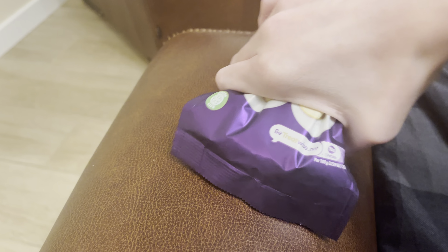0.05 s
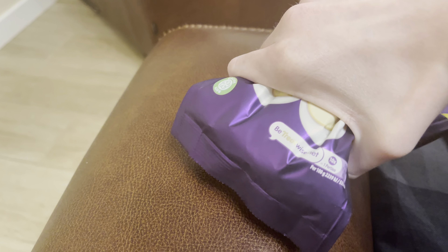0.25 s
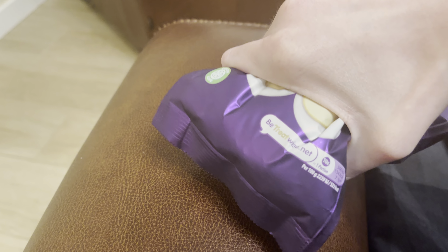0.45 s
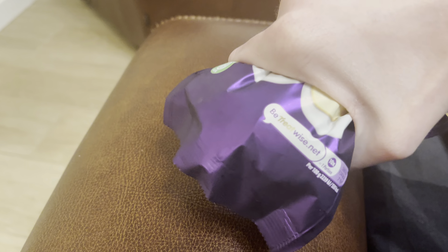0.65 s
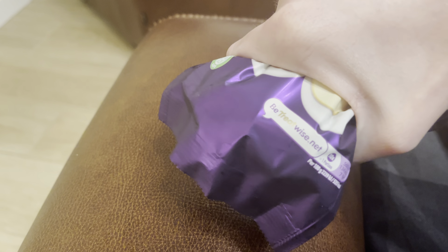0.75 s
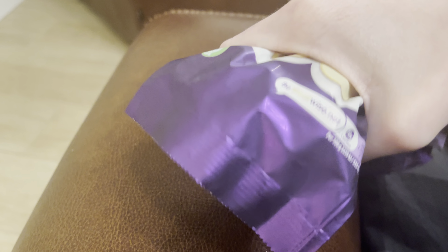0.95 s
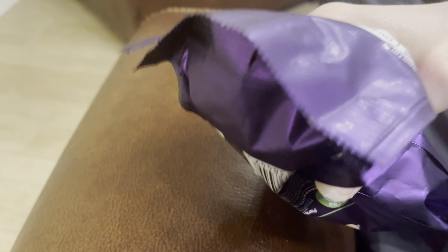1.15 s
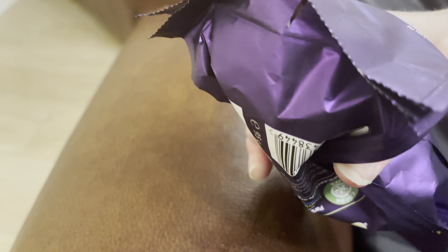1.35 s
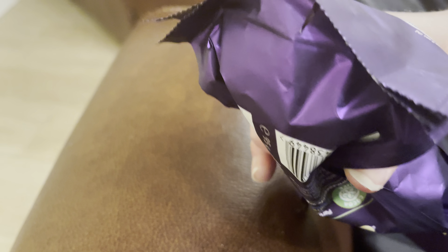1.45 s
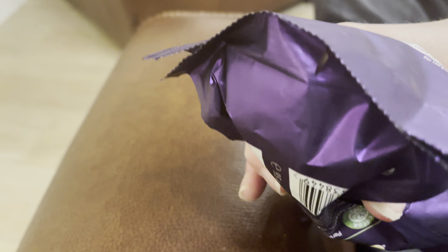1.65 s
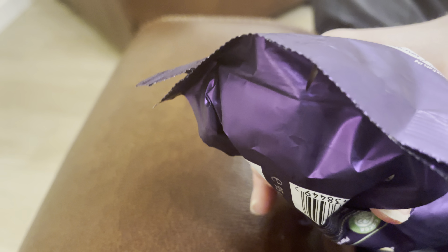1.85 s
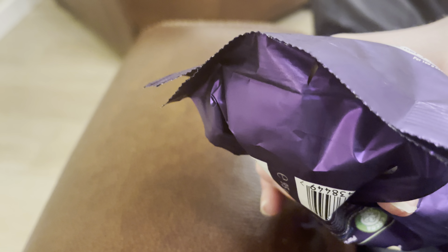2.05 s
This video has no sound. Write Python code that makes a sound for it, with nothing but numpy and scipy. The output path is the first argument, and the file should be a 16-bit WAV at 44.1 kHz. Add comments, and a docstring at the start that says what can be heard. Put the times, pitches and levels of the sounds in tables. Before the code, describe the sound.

A small foil pouch is squeezed close to a stereo microphone in a quiet furnished room. Bright creases snap over rustling and dull bumps, with a stronger thud near 0.6 s. At about 0.7 s the seam tears and air bursts out in one loud, low pop, puffing until 1 s. Slack foil crackles until about 1.3 s, then ticks ever more faintly to 2 s over soft room hush.

```python
"""A quiet furnished room: a hand squeezes a small foil pouch close to a stereo microphone.
Creases snap, each a short panel ring with bursts of noise; small random ticks and a rustle fill in beneath.
The pouch body bumps and rumbles; the seam tears near 0.7 s, the air pops out in one swing and puffs on.
The slack foil goes on ticking, ever more faintly, over a soft hush and a short echo of the room."""
import sys
import numpy as np
from scipy import signal
from scipy.fft import rfft, irfft
from scipy.io import wavfile
from scipy.ndimage import uniform_filter1d

SR = 44100
rng = np.random.default_rng(int(sys.argv[2]) if len(sys.argv) > 2 else 0)


def to_wav(s):
    """Save 16-bit WAV."""
    ch = np.atleast_2d(s).T  # columns
    pcm = np.round(np.clip(ch, -1, 1) * 32767)  # PCM
    wavfile.write(sys.argv[1], SR, pcm.astype(np.int16))


N = 92610
HZ = np.maximum(np.fft.rfftfreq(2 * N, 1 / SR), 1)  # filter frequencies, padded to twice the length


def undb(db):
    """Amplitude factor for a level in dB."""
    return 10 ** (np.asarray(db) / 20)


def over_hz(table):
    """Read a table at every filter frequency, straight lines on a log frequency axis."""
    hz, value = np.array(table).T
    return np.interp(np.log(HZ), np.log(hz), value)


def over_time(table):
    """Read a table at every sample, straight lines in time."""
    seconds, value = np.array(table).T
    return np.interp(np.arange(N) / SR, seconds, value)


def shape(x, gain):
    """Filter by a gain for each frequency."""
    return irfft(rfft(x, 2 * N) * gain, 2 * N)[..., :N]


def resonance(hz, width_hz):
    """Response of a damped resonator, with a gain of 1 at its centre."""
    return 1j * HZ * width_hz / (hz ** 2 - HZ ** 2 + 1j * HZ * width_hz)


def flicker(rate_hz):
    """Random levels held 1 / rate_hz seconds, then smoothed into glides."""
    hold = int(SR / rate_hz)
    steps = np.repeat(rng.standard_normal(N // hold + 1), hold)
    return uniform_filter1d(steps, hold)[:N]


def ring(t, hz, fall_cycles, turn):
    """A tone that swells and dies within a few cycles; its envelope peaks at 1."""
    rise_cycles = 0.29
    swell = (1 - np.exp(-t * hz / rise_cycles)) * np.exp(-t * hz / fall_cycles)
    return swell / swell.max() * np.sin(2 * np.pi * (hz * t + turn))


def room_hush():
    """Quiet room tone: steady noise, weighted to the lows, independent left and right."""
    # Colour of the quiet room: (f/Hz, relative level/dB per Hz)
    room_colour = [(60, -8), (300, -11), (1200, -10.5), (4600, -27.5), (12000, -35.5)]
    hush = shape(rng.standard_normal((2, N)), undb(over_hz(room_colour)))
    return hush / hush.std() * undb(-69)


def room_echo(near):
    """Reflections off the room, as a short noise tail that decays exponentially."""
    echo_db, t60_s = -11, .1
    centre_hz, width_hz = 1800, 7000
    t = np.arange(N) / SR
    tail = rng.standard_normal((2, N)) * undb(-60 * t / t60_s)
    tail = tail * (t > .004)  # the first reflections come after 4 ms
    tail = tail / np.sqrt(np.sum(tail ** 2, axis=1, keepdims=True))
    return undb(echo_db) * shape(near, rfft(tail, 2 * N) * resonance(centre_hz, width_hz) ** 2)


def body():
    """The pouch body flexes in short damped low bumps, over the wavering rumble of the kneading hand."""
    # Dull bumps of the pouch body: (t/s, f/Hz, level/dB)
    thumps = [(0.1668, 455, -31), (0.2028, 423, -30.5), (0.2239, 258, -33.5), (0.2794, 315, -34),
              (0.3106, 338, -24), (0.3532, 351, -34), (0.4225, 300, -34), (0.475, 175.4, -30),
              (0.5417, 335, -34), (0.5794, 348, -19), (0.706, 467, -20), (0.7103, 490, -13.5),
              (1.0596, 443, -30.5), (1.323, 543, -37.5), (1.433, 311, -39.5), (1.5216, 470, -42),
              (1.7097, 470, -48)]
    # Low rumble of the hand kneading the pouch: (t/s, level/dB)
    rumble_level = [(.1, -69), (.45, -62), (1.15, -60.5), (1.7, -72.5), (2, -80.5)]
    thump_cycles, rumble_hz = 0.79, 109
    knock_s, knock_hz, knock_db, knock_cycles = 1.5875, 427, -44, 4.9  # one bump rings hollow
    t = np.arange(N) / SR
    bumps = undb(knock_db) * ring(np.maximum(t - knock_s, 0), knock_hz, knock_cycles, 0)
    for s, hz, db in thumps:
        bumps = bumps + undb(db) * ring(np.maximum(t - s, 0), hz, thump_cycles, 0)
    rumble = shape(rng.standard_normal(N), resonance(rumble_hz, rumble_hz))
    waver_db = 4.1 * flicker(14.0)
    rumble = rumble / rumble.std() * undb(over_time(rumble_level) + waver_db)
    no_sub = 1 / np.sqrt(1 + (60 / HZ) ** 4)
    return shape(bumps + rumble, no_sub)


def air():
    """The pop is one swing of the pouch's air with a slow push under it; a low flutter follows."""
    # Air still puffing from the open pouch: (t/s, level/dB)
    puff_level = [(.72, -70.5), (.735, -36.5), (.79, -34.5), (.85, -49.5), (.9, -40), (.97, -59),
                  (1.1, -86.5)]
    pop_s, pop_hz, pop_octaves, pop_db = .7146, 243.2, 0.77, -1
    sub_db = -13  # slow push, relative to the swing
    push = np.zeros(N)
    push[int(pop_s * SR)] = 1
    swing = np.exp(-(np.log2(HZ / pop_hz) / pop_octaves) ** 2)
    slow_push = undb(sub_db) / (1 + (HZ / 60) ** 2)
    pop = shape(push, swing + slow_push)
    pop = pop / np.abs(pop).max() * undb(pop_db)
    flutter = sum(resonance(hz, width_hz=70) ** 2 for hz in (233, 312))
    puff = shape(rng.standard_normal(N), flutter)
    return pop + puff / puff.std() * undb(over_time(puff_level))


def band(lo_hz, hi_hz):
    """The foil colour between two edges; white noise keeps its level."""
    # Colour of foil and microphone together: (f/Hz, relative level/dB per Hz)
    foil_colour = [(40, -12), (320, -1), (590, -1), (870, -11.5), (1320, 2.5), (2470, -5.5), (5110, -4),
                   (7350, -12), (9140, -9), (10000, -4.5), (10300, -10.5), (10700, -2), (11400, -6.5),
                   (13500, -28), (16300, -35)]
    edges = np.sqrt((1 + (lo_hz / HZ) ** 8) * (1 + (HZ / hi_hz) ** 8))
    gain = undb(over_hz(foil_colour)) / edges
    return gain / np.sqrt(np.mean(gain ** 2))


def crackle(rows):
    """Each snap rings its panel under two noise bursts; drawn twice, for the middle and the stereo spread."""
    size, lead = 440, .002  # samples per snap; seconds before its peak
    rise_s, fall_s = 0.00032, .0011
    panel_cycles, panel_tilt = 1.81, 0.47  # fall at 1200 Hz; higher panels ring for more cycles
    parts = np.zeros((3, 2, N + size))  # panel, crack, treble
    t = np.arange(size) / SR - lead
    burst = np.where(t < 0, np.exp(-(t / rise_s) ** 2), np.exp(-np.abs(t) / fall_s))
    turns = rng.random((len(rows), 2, 1))  # starting phases
    for (s, hz, *db), turn in zip(rows, turns):
        i = int(np.clip((s - lead) * SR, 0, N - 1))
        gain = undb(db)
        fall_cycles = panel_cycles * (hz / 1200) ** panel_tilt
        since_start = np.maximum(t + .5 / hz, 0)  # the panel starts half a cycle early
        parts[0, :, i:i + size] += gain[0] * ring(since_start, hz, fall_cycles, turn)
        parts[1:, :, i:i + size] += gain[1:, None, None] * burst
    panel, crack, treble = parts[..., :N]
    noise = rng.standard_normal((2, 2, N))
    no_bass = 1 / np.sqrt(1 + (550 / HZ) ** 6)
    cracks = shape(crack * noise[0], band(1920, 9400))
    trebles = shape(treble * noise[1], band(6500, 16000))
    return shape(panel, no_bass) + cracks + trebles


def scatter(times, level_db, spread_db):
    """Rows for random small snaps: rare strong ones, each with its own colour and panel."""
    # Offsets on each tick's level: (panel level/dB, crack level/dB, treble level/dB)
    parts_db = [-4, -7.5, -9.5]
    colour_db = 4.5
    draw = rng.random((len(times), 2))
    tint = rng.standard_normal((len(times), 3))
    size_db = level_db - spread_db * np.log(1 - .92 * draw[:, 0])
    hz = 800 * 3.9 ** (draw[:, 1] ** 1.2)
    return np.column_stack([times, hz, size_db[:, None] + np.array(parts_db) + colour_db * tint])


def foil():
    """Creasing foil: loud snaps, a random shower of small ticks and a noise rustle beneath."""
    # Creases that snap, densest where the seam tears at .70-.72 s:
    # (t/s, panel f/Hz, panel level/dB, crack level/dB, treble level/dB)
    snaps = [(0.055, 1280, -24, -22.5, -21.5), (0.062, 1700, -23, -30, -27),
             (0.138, 3040, -23.5, -29, -19.5), (0.2041, 3800, -13, -14.5, -12.5),
             (0.2096, 1380, -20, -25, -26), (0.216, 926, -21, -25, -32), (0.2202, 1360, -22, -19.5, -11),
             (0.227, 1340, -20.5, -20, -30), (0.262, 3080, -23, -33, -15), (0.2645, 800, -25, -27, -40),
             (0.281, 820, -25.5, -47, -50), (0.305, 1230, -20, -21, -28), (0.3062, 2810, -8.5, -23.5, -19),
             (0.3125, 1490, -26, -10, -14), (0.316, 1300, -15.5, -45, -21.5), (0.3551, 1850, -17, -25, -26),
             (0.3635, 2050, -22.5, -33, -20), (0.3967, 2130, -26.5, -43, -20),
             (0.4247, 1097, -10.5, -33, -20), (0.4591, 1310, -24.5, -25.5, -36),
             (0.4769, 2140, -14, -44, -24), (0.5225, 3070, -19, -37.5, -16.5),
             (0.5431, 1400, -17, -12, -12), (0.58, 1395, -10.5, -11, -15),
             (0.6275, 3050, -23.5, -28.5, -26), (0.6923, 1390, -31.5, -24.5, -14.5),
             (0.7042, 1141, -19.5, -25, -15), (0.7052, 1100, -12, -21, -11), (0.709, 1350, -9, -35.5, -3.5),
             (0.7115, 929, -18, -15.5, -19.5), (0.7135, 865, -11.5, -16.5, -14.5),
             (0.7161, 1400, -14, -13.5, -15.5), (0.7387, 1440, -17.5, -23, -25),
             (0.7697, 1060, -26.5, -29, -23.5), (0.819, 1390, -25.5, -65, -48),
             (0.8643, 1360, -28, -44.5, -33), (0.9636, 1030, -31, -27, -15.5),
             (0.9824, 1310, -36, -22.5, -25), (0.9947, 3000, -48, -28.5, -17.5),
             (1.0268, 1380, -23, -24, -19.5), (1.0314, 2070, -24.5, -23.5, -30),
             (1.0421, 1300, -32, -35, -19.5), (1.0599, 1220, -17.5, -27, -47),
             (1.0762, 1300, -22, -22.5, -28), (1.085, 1280, -31, -26, -22), (1.1336, 1310, -32, -27.5, -27),
             (1.1425, 2000, -24, -39, -30), (1.159, 1360, -28.5, -32.5, -52.5),
             (1.1664, 900, -36.5, -27.5, -23), (1.18, 2480, -26, -52, -19.5), (1.188, 930, -29.5, -42, -40),
             (1.2327, 2290, -35, -40.5, -24.5), (1.2434, 2380, -24.5, -30, -20),
             (1.2924, 1270, -31, -30, -27), (1.326, 1090, -30.5, -35, -53), (1.4313, 1280, -37, -27, -26),
             (1.522, 1840, -33, -37, -28.5), (1.5721, 2000, -30.5, -33, -30.5),
             (1.5861, 1140, -22, -31.5, -34.5), (1.6094, 1110, -48.5, -44, -33.5),
             (1.6284, 1960, -31, -41.5, -42.5), (1.6523, 1110, -36.5, -71.5, -57),
             (1.6692, 2000, -39, -44, -45), (1.7082, 1030, -30, -32, -31.5),
             (1.8382, 1290, -42.5, -42.5, -36.5), (1.9351, 2130, -38, -46, -51.5),
             (2.0641, 1890, -41.5, -69, -77.5)]
    # How hard the foil is worked: (t/s, level/dB)
    squeeze = [(0, -32.5), (.19, -37), (.37, -35), (.63, -38), (.72, -26), (.8, -34.5), (.92, -38.5),
               (.98, -33.5), (1.1, -35), (1.2, -40), (1.34, -51), (1.6, -57), (1.75, -51.5), (1.9, -68),
               (1.97, -59.5), (2.1, -81.5)]
    ticks_per_s, spread_db = 450, 6.0
    rustle_db, flicker_db = -6.5, 0.5
    work = over_time(squeeze)
    times = np.cumsum(rng.exponential(1, 4000)) / ticks_per_s
    times = times[times < N / SR]
    ticks = scatter(times, work[(times * SR).astype(int)] - spread_db, spread_db)
    rustle = shape(rng.standard_normal((2, N)), band(150, 16000))
    rustle = rustle * undb(work + rustle_db + flicker_db * flicker(38.84))
    return crackle(np.vstack([np.array(snaps, float), ticks])) + rustle


def at_microphone():
    """Close stereo pickup: foil spread by likeness per pitch, air and body central, right treble early."""
    # How alike left and right are: (f/Hz, likeness/0-1)
    likeness = [(150, 0), (500, 0.33), (1300, 0.6), (2200, 0), (5000, 0), (7500, 0.4), (9000, .95),
                (16000, 0.93)]
    left_db = 1.2  # left over right
    port_lag_s, in_step_hz = 0.00029, 8470  # the treble reaches the right port first
    one, other = foil()
    alike = np.clip(over_hz(likeness), 0, 1)
    mid = shape(one, np.sqrt((1 + alike) / 2)) + air() + body()
    side = shape(other, np.sqrt((1 - alike) / 2))
    treble = 1 / (1 + (7500 / HZ) ** 8)
    lead = np.exp(2j * np.pi * treble * (HZ - in_step_hz) * port_lag_s)
    left = (mid + side) * undb(left_db / 2)
    right = shape(mid - side, lead) * undb(-left_db / 2)
    return np.array([left, right])


def scene():
    """The pouch close to the microphone, its echo off the room, and the room's hush."""
    near = at_microphone()
    return near + room_echo(near) + room_hush()


def record(dry):
    """Lows arrive late through the microphone chain, the loudest peaks are rounded and the top is cut."""
    lag_cycles = .95  # each pitch above 40 Hz is delayed by this many of its cycles
    dip_hz, dip_depth = 670, .5  # the microphone hears less in a narrow band
    limit, top_hz = .95, 16400
    dip = 1 - dip_depth * np.abs(resonance(dip_hz, dip_hz / 4)) ** 2
    lag = np.exp(-2j * np.pi * lag_cycles * np.log(np.maximum(HZ, 40) / 20000))
    late = shape(dry, dip * lag)
    rounded = late / (1 + (np.abs(late) / limit) ** 4) ** .25
    top_cut = signal.ellip(12, .2, 90, top_hz, fs=SR, output="sos")
    return signal.sosfilt(top_cut, rounded)


dry = scene()
out = record(dry)
to_wav(out)
```